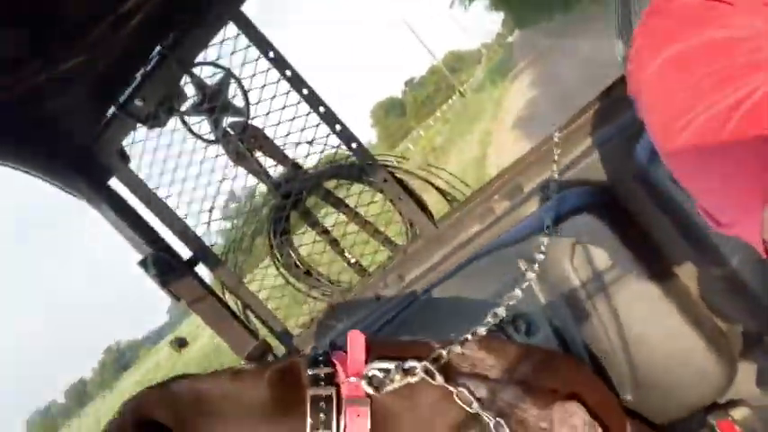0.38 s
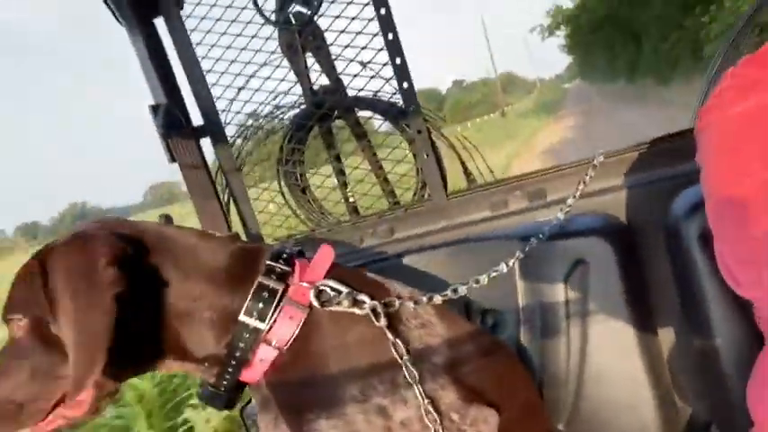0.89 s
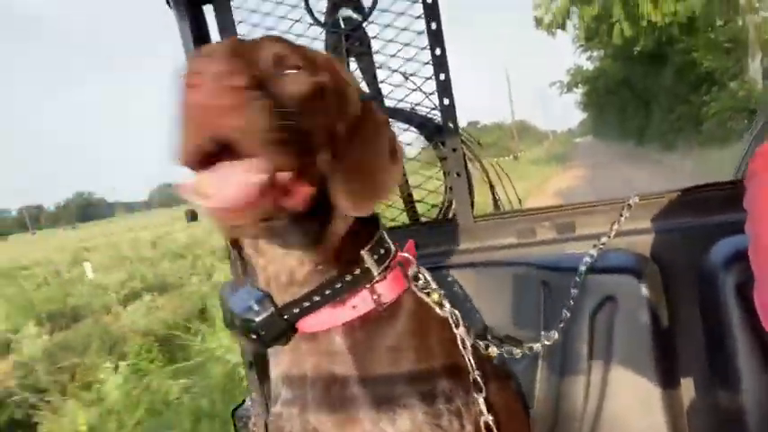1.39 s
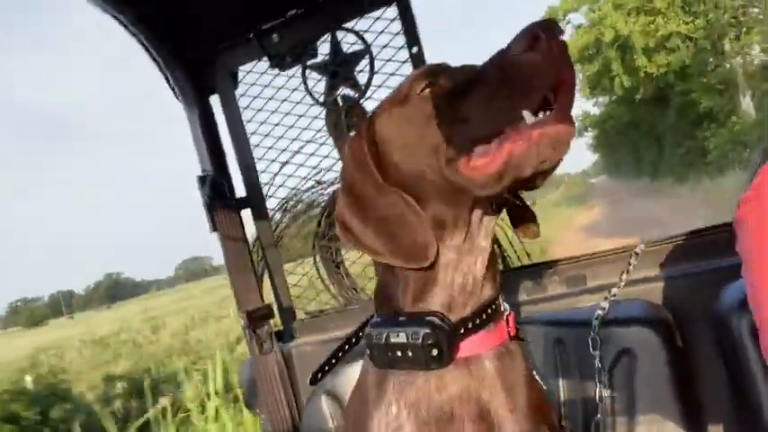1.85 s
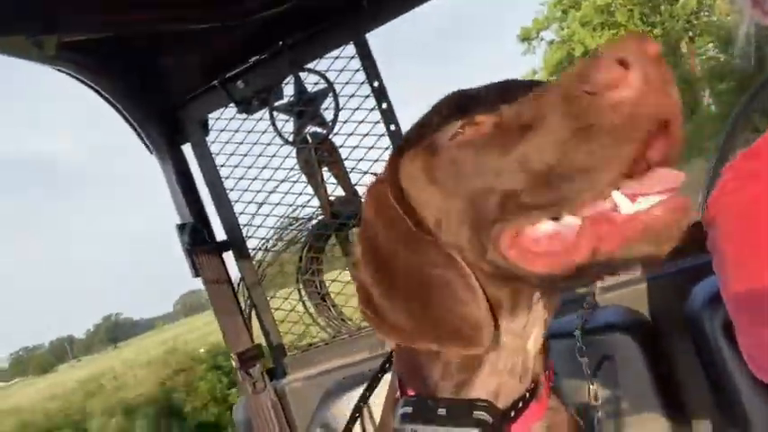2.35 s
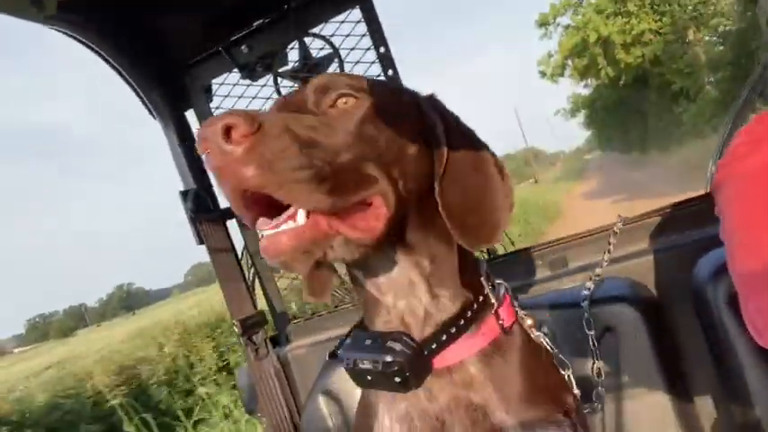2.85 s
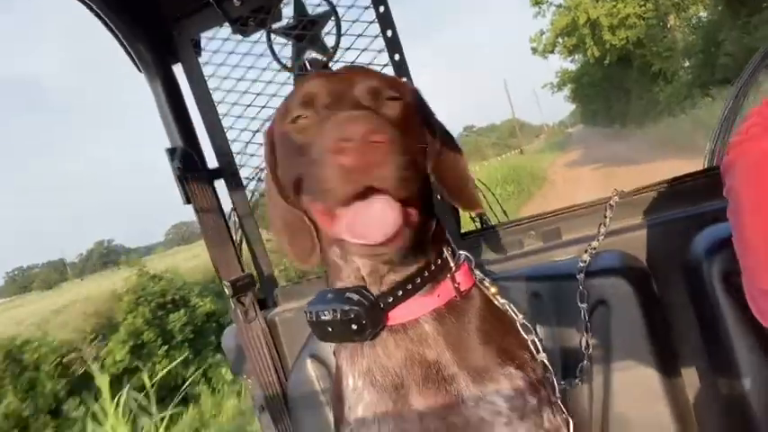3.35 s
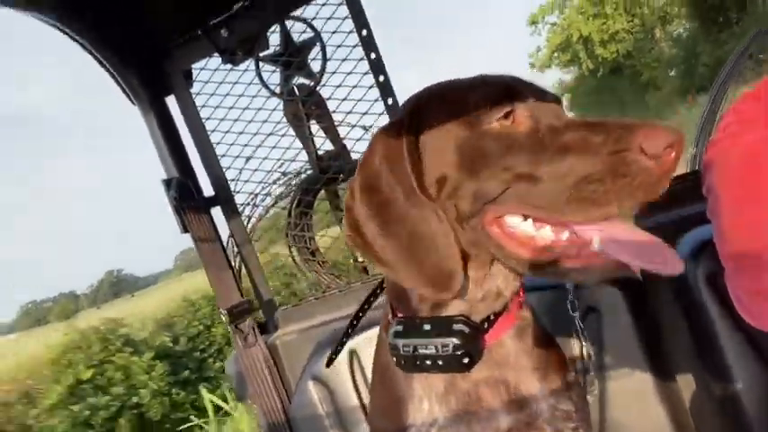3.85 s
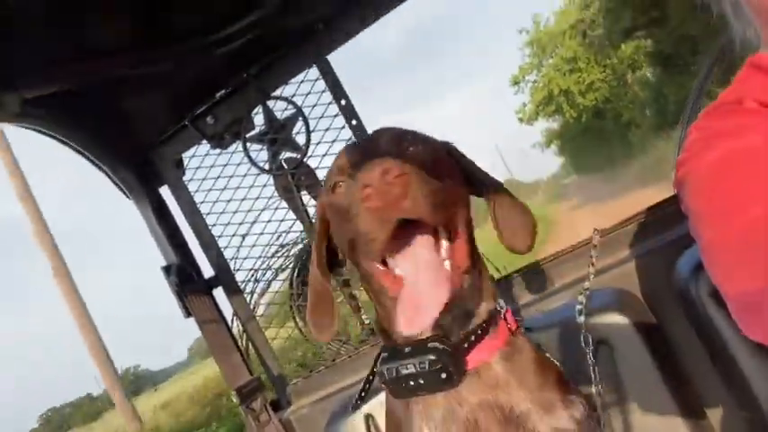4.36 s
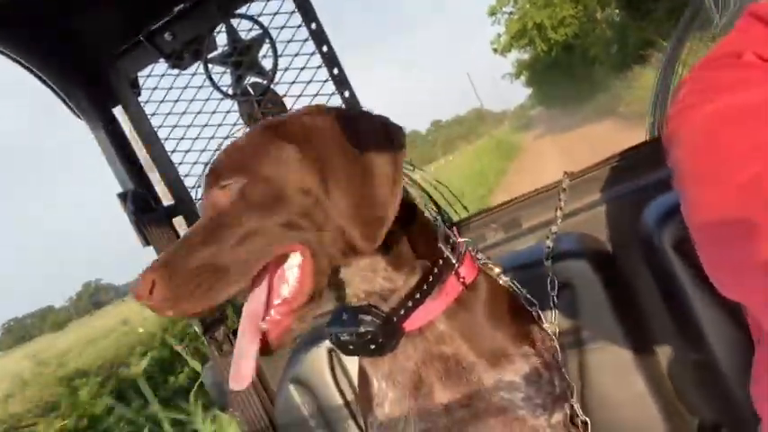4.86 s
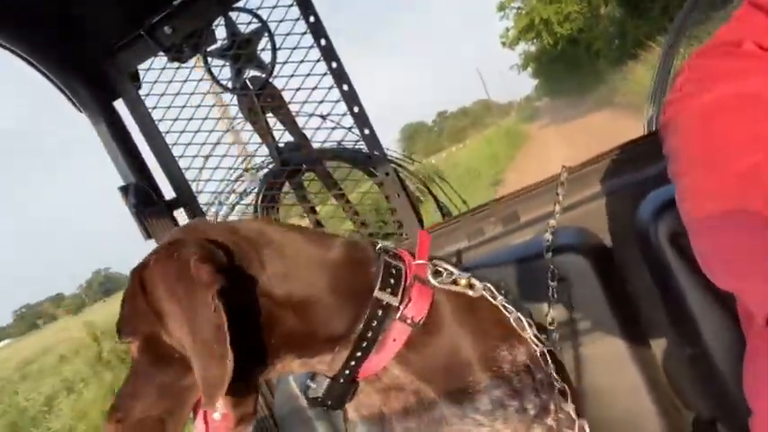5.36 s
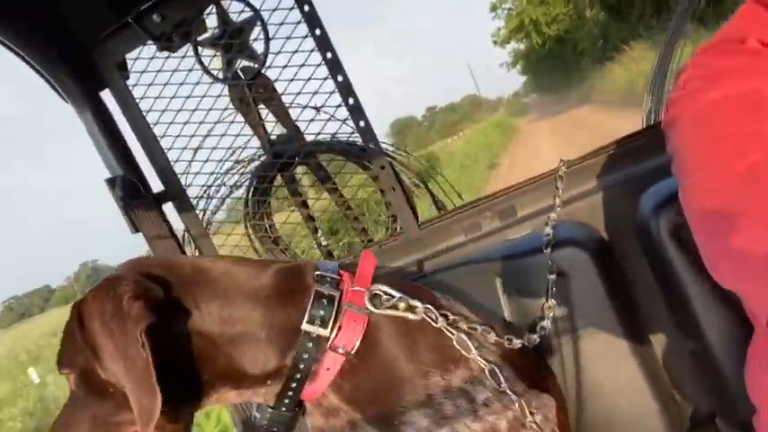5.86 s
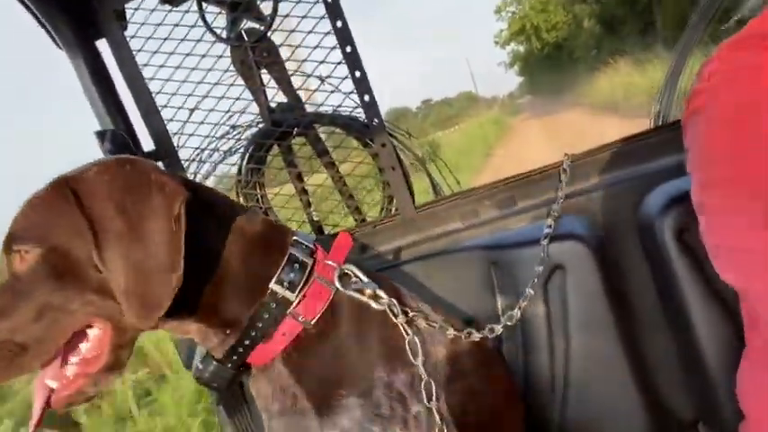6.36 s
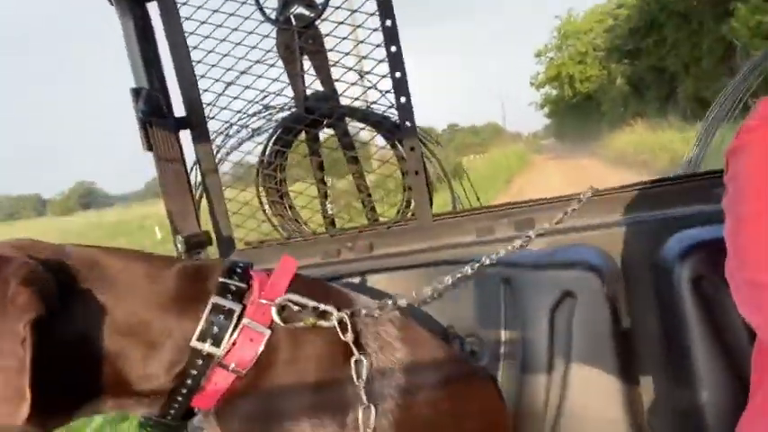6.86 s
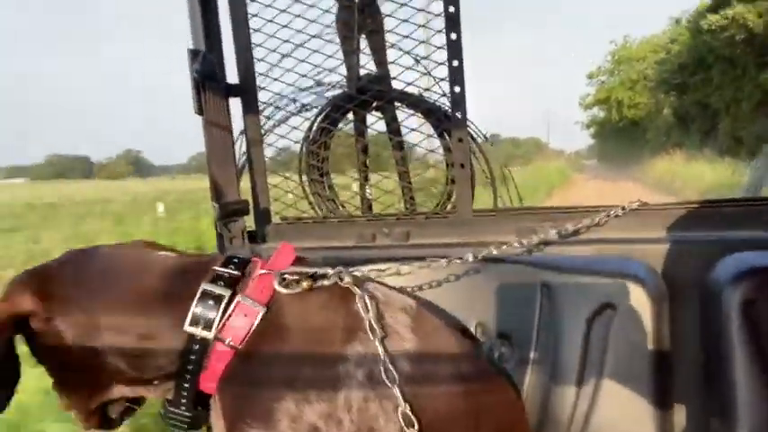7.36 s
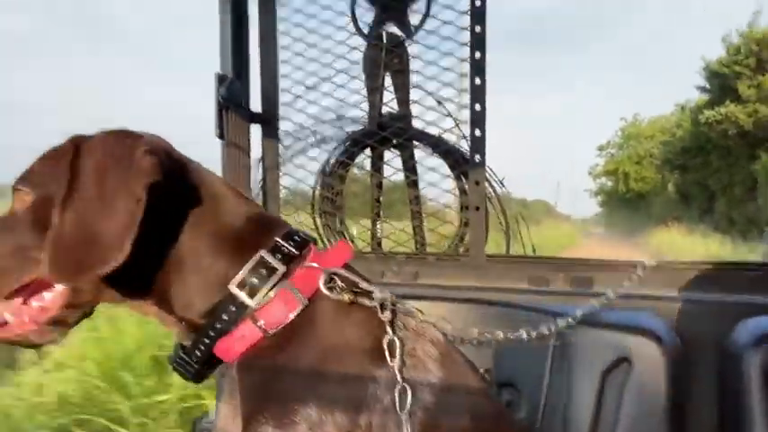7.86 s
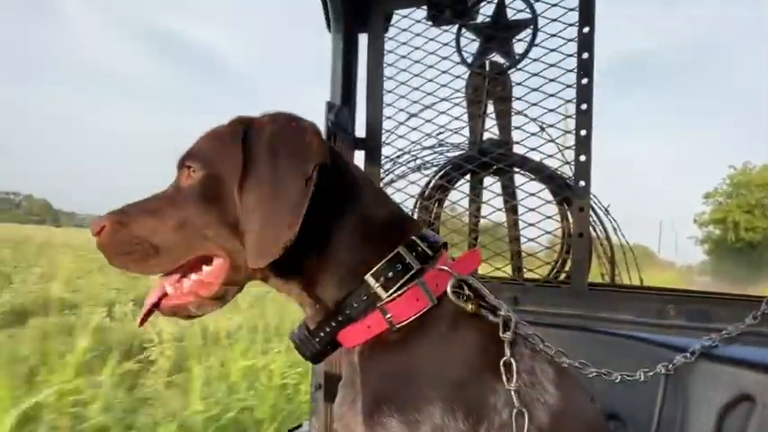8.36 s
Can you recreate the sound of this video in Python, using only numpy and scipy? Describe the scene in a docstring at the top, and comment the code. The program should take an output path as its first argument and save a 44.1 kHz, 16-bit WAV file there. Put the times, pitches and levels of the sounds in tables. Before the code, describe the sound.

Inside an open utility vehicle on a dirt track, a loud, steady low exhaust drone dominates, with body and tyre roar and a thin wavering gear whine beneath. A dog's metal chain chinks irregularly, most sharply near five seconds, when wind also thumps the close stereo microphone. Loose fittings tick faintly throughout.

```python
"""The exhaust boom of a four-stroke engine runs throughout, while an open utility vehicle rolls along a
dirt track. The place is the cab, heard close on a pair of microphone ports. The boom is a sum of firing
orders; gear whines and ringing panels are tones spread by noise; a dog's chain chinks in struck modes and
bursts; loose fittings tick through resonators. Behind them, body and tyres roar in bands of noise,
and wind buffets the ports with lumpy low noise and short puffs."""
import sys
import numpy as np
from scipy import signal
from scipy.fft import rfft, irfft, next_fast_len
from scipy.io import wavfile

SR = 44100
rng = np.random.default_rng(int(sys.argv[2]) if len(sys.argv) > 2 else 0)


def generate_wav(sig):
    """Save sig (samples, or channels by samples) to the path in sys.argv[1] as 16-bit PCM at SR."""
    pcm = np.round(np.clip(np.atleast_2d(sig).T, -1, 1) * 32767).astype(np.int16)
    wavfile.write(sys.argv[1], SR, pcm)


def invert_db(x):
    """Field ratio 10**(x/20) for x, a level in decibels (scalar or array-like)."""
    u = np.asarray(x, float) / 20
    return 10 ** u


N = 384596

# In every table pan_db is positive to the left port, and lag_rad is how far the left port lags.
# engine speed: start_s, firing_cycles_per_s
ENGINE_SPEED = [(0.0, 21.181), (0.51, 21.635), (1.03, 21.699), (1.54, 21.772), (2.05, 21.766),
                (2.56, 21.651), (3.08, 21.861), (3.59, 21.649), (4.1, 21.762), (4.62, 21.876),
                (5.13, 21.998), (5.64, 22.042), (6.16, 22.159), (6.67, 22.045), (7.18, 21.793),
                (7.69, 22.09), (8.21, 21.956), (8.72, 22.174)]
# strength of each exhaust order: multiple_of_cycle_rate, relative_level_db
EXHAUST_ORDERS = [(2, -46), (3, -17.5), (4, 0), (5, -1.5), (6, -19), (7, -19), (8, -21), (9, -35),
                  (10, -27.5)]
# exhaust resonances that delay the orders: pitch_hz, width_hz
PIPE_RESONANCES = [(91, 14), (106, 14), (144, 16)]
# lower gear whine, following road speed: start_s, pitch_hz, level_db
LOWER_WHINE = [(0, 797, -37.5), (1.5, 799, -36), (2.4, 818.3, -35.5), (4.0, 818.3, -33), (5.7, 828, -35),
               (6.5, 825.4, -34), (7.6, 848, -33.5), (8.72, 846.5, -33)]
# image of the lower whine, swinging from right to left: start_s, pan_db, lag_rad
WHINE_IMAGE = [(0, -6, 0.3), (1.7, -9, -1.7), (3.9, -6.5, 1.5), (5.5, -5, 1.5), (6.2, -5, 2.5),
               (7.1, 11, 3), (8.72, 12, 3)]
# other drivetrain levels: start_s, upper_whine_db, housing_ring_db, thin_high_tone_db
DRIVETRAIN_LEVELS = [(0, -43, -38, -43), (.6, -39, -41, -46), (1.7, -33.5, -36, -50),
                     (2.4, -39.5, -41, -58), (3.4, -33.5, -37.5, -47), (4.1, -40, -43, -58),
                     (5.0, -33, -41.5, -43), (5.75, -36, -47, -42), (6.15, -31.5, -37.5, -43),
                     (6.9, -34.5, -33.5, -59), (7.1, -46, -36, -57), (7.8, -43, -32.5, -54),
                     (8.2, -39, -39, -42), (8.72, -40, -41, -44)]
# ringing panels: pitch_hz, width_hz, relative_level_db, pan_db, lag_rad
PANEL_RINGS = [(1056, 55, -41.5, 0.5, -0.3), (1227, 22, -43, -2, -1.9), (2658, 32, -45, 1, 4),
               (2913, 44, -50, 1, 3.5)]
# the louder chain chinks: start_s, level_db, low_modes_db
LOUD_CHINKS = [(0.2478, -32, -8), (0.6602, -22, -2.5), (0.9684, -37, 10), (1.0114, -39, 10),
               (1.097, -36.5, 9), (1.2017, -31, -7), (1.2594, -35, 1), (1.3897, -34, -9),
               (1.4832, -28.5, 6.5), (1.7757, -27.5, 8.5), (2.0394, -30, -10), (2.6439, -30, -10),
               (2.8714, -28, -6), (3.3308, -25.5, -2), (4.117, -24.5, 3.5), (4.9174, -16.5, 0),
               (5.106, -19, -9), (5.4271, -34, -9), (5.5263, -29, -5), (5.5817, -27, -11),
               (6.183, -20.5, -3), (6.8433, -28.5, -5), (7.2275, -32.5, 4), (7.4405, -22, -8.5),
               (7.7403, -36, 13), (7.8052, -28, -15), (7.9329, -26, -4), (8.6113, -25.5, -5)]
# ringing modes of the chain links: pitch_hz, relative_level_db, t60_s
LINK_MODES = [(3200, -4, .07), (3800, 2, .08), (4450, -3, .06), (5500, 0, .06), (6430, -7, .04),
              (7500, -9, .04), (8400, -9, .035), (9600, -10, .03), (11500, -7, .03), (12450, -9, .03)]
# roar of body, intake and tyres: pitch_hz, level_db_per_hz, port_likeness (0 to 1),
# pan_db (added on the left and taken off on the right, in each port's own part only)
ROAR_SPECTRUM = [(28, -63, 0.89, 8), (45, -48.5, 1, 0), (69.6, -41, 1, 0), (115, -45, 1, 6),
                 (187, -51, 1, 4), (320, -51.5, 0.98, 9.5), (480, -53, 0.94, -5.5), (682, -59, 0.99, 17),
                 (1110, -64.5, 0.68, 4), (1360, -64, 0.82, 3.5), (2130, -67, 0.34, 3), (2740, -76, 1, -2.5),
                 (3580, -73, 0.046, 1.5), (4880, -78, 1, 1.5), (6820, -81, 0.82, -3),
                 (8250, -85.5, 0.96, 2), (10500, -89.5, 1, 0), (13000, -90, 0.67, -2), (15500, -88, .98, 2)]
# load on the vehicle, used as departures from the mean: start_s, rumble_db, hiss_db
ROAR_LOAD = [(0, -28, -37.5), (1.3, -24.5, -36.5), (3.3, -26, -37), (4.1, -27, -37), (5.7, -26.5, -37),
             (6.5, -27.5, -39), (8.72, -27, -36.5)]
# gusts on the ports: centre_s, level_db, half_length_s (to 1/e)
WIND_GUSTS = [(.12, -31, 0.31), (3.98, -27, 0.061), (5.287, -16.5, .08), (5.6, -39, 0.14),
              (6.004, -29, .07), (8.3, -38.5, 0.74)]
# single puffs of wind: centre_s, level_db, pitch_hz, pan_db
WIND_PUFFS = [(0.115, -9, 151, 1.5), (0.157, -11, 276, 3), (0.169, -15, 50, 2), (3.306, -17.5, 480, -2),
              (4.755, -14, 412, 3), (4.85, -15.5, 248, -1), (5.258, -13, 320, 5), (5.286, -10.5, 168, 4),
              (5.325, -18, 233, 13), (3.375, -16, 500, -1), (3.41, -12, 480, -1), (3.45, -18, 390, -2),
              (5.299, -13.5, 513, 6), (5.341, -2, 415, 4)]

FIRST_FIRING_S = .0307
PORT_LAG_S = .000095   # chain, rattle and hiss reach the left port later


def rms_one(x):
    """Scale to unit rms."""
    return x / np.sqrt(np.mean(x ** 2) + 1e-20)


def in_time(rows):
    """Columns of a table as curves over all samples."""
    start_s, *columns = np.transpose(rows)
    return [np.interp(np.arange(N) / SR, start_s, column) for column in columns]


def drift(corner_hz):
    """Slow chance with spread 1: noise through two equal poles, at one point per 40 samples."""
    pole = np.exp(-80 * np.pi * corner_hz / SR)
    noise = rng.standard_normal(N // 40 + 2002)
    slow = signal.lfilter([1], [1, -2 * pole, pole * pole], noise)[2000:]   # settled part only
    return np.interp(np.arange(N) / 40, np.arange(len(slow)), rms_one(slow))


def narrow_noise(width_hz):
    """Complex wobble that spreads a tone over a width."""
    return (drift(width_hz * .78) + 1j * drift(width_hz * .78)) / np.sqrt(2)


def to_ports(x):
    """The left port hears a sound a little later than the right: a delay by phase slope."""
    size = next_fast_len(N + 64)
    hz = np.arange(size // 2 + 1) * SR / size
    late = rfft(x, size) * np.exp(-2j * np.pi * hz * PORT_LAG_S)
    return np.array([irfft(late, size)[:N], x])


def tone(hz, width_hz, level_db, pan_db, lag_rad, clean, alike):
    """A tone, part steady and part spread; the ports share only some of the spread part."""
    carrier = np.exp(2j * np.pi * np.cumsum(hz * np.ones(N)) / SR)
    shared = narrow_noise(width_hz)
    ports = []
    for side in (1, -1):   # left, right
        spread = np.sqrt(alike) * shared + np.sqrt(1 - alike) * narrow_noise(width_hz)
        wobble = np.sqrt(clean) + np.sqrt(1 - clean) * spread
        wave = wobble * carrier * np.exp(-.5j * side * lag_rad)
        ports.append(np.sqrt(2) * invert_db(level_db + side * pan_db / 2) * wave.real)
    return np.array(ports)


def cycle_angle():
    """Angle through the firing cycle in radians, from the summed engine speed."""
    rate, = in_time(ENGINE_SPEED)
    return 2 * np.pi * (np.cumsum(rate) / SR - FIRST_FIRING_S * rate[0])


def exhaust(uneven_db=1., wobble_rad=0.013):
    """Orders of the firing pulse, each delayed by the pipe resonances; firings differ a little."""
    start_db, sag_db_per_s = -11, 0.07
    angle = cycle_angle() + wobble_rad * drift(5.7)
    mean_rate = np.mean(ENGINE_SPEED, axis=0)[1]
    boom = 0
    for order, level_db in EXHAUST_ORDERS:
        hz = order * mean_rate
        lag = sum(np.arctan2(width * hz, centre ** 2 - hz ** 2) for centre, width in PIPE_RESONANCES)
        boom = boom - invert_db(level_db + uneven_db * drift(6.2)) * np.cos(order * angle - lag)
    return invert_db(start_db - sag_db_per_s * np.arange(N) / SR) * rms_one(boom)


def gears():
    """Two whines an octave apart flutter in pitch together; the housing rings in three strands."""
    housing_hz, high_hz, whine_swell_db = 1787, 2080, 1.5
    upper_db, housing_db, high_db = in_time(DRIVETRAIN_LEVELS)
    pan_db, lag_rad = in_time(WHINE_IMAGE)
    lower_hz, lower_db = in_time(LOWER_WHINE)
    lower_hz = lower_hz * (1 + 0.003924 * drift(3.12))
    lower_db = lower_db + whine_swell_db * drift(1.6)
    out = tone(lower_hz, 23.5, lower_db, pan_db, lag_rad, clean=0.42, alike=0.67)
    out += tone(2 * lower_hz, 45.0, upper_db, 2.8, 0.55, clean=0.14, alike=0.78)
    for ratio, strand_db in ((1.024, -4.0), (.999, 0.0), (.966, -7.0)):
        strand_hz = housing_hz * ratio * (1 + 0.00402 * drift(1.5))
        out += tone(strand_hz, 35.0, housing_db + strand_db, 4.0, 1.0, clean=0.0078, alike=0.74)
    return out + tone(high_hz, 31.0, high_db, 4.1, 1.4, clean=0.069, alike=0.51)


def panels():
    """Panels ring as spread tones at fixed pitches; together they build up, then fade."""
    t = np.arange(N) / SR
    fade_db_per_s, rise_s = 0.97, 0.81
    level_db = 6 - fade_db_per_s * t - 8.3 * np.exp(-t / rise_s)
    return invert_db(level_db) * sum(tone(*panel, clean=0.0078, alike=0.62) for panel in PANEL_RINGS)


def chain(crack_db=-3., ring_db=-9.5, tail_db=-6., echo_db=-17., aside_db=.6, front_db=-14.):
    """Each chink: a short crack, the link modes struck with fresh strengths, and a rattling tail."""
    faint_count, faint_db, crack_t60_s, tail_t60_s, echo_t60_s = 16, -38, .016, 0.12, 0.51
    out, t = np.zeros(N + SR), np.arange(SR // 5) / SR
    hz, mode_db, mode_t60 = np.transpose(LINK_MODES)[:, :, None]
    # fainter chinks fall at random: time, level within 5 dB, low modes within 20 dB
    faint = rng.random((faint_count, 3)) * [N / SR, 5, 20] + [0, faint_db, -12]
    low_band = signal.butter(2, [3000, 4440], "band", fs=SR, output="sos")
    high_band = signal.butter(2, [5000, 11500], "band", fs=SR, output="sos")
    decay = invert_db(-60 * t / mode_t60)   # each link mode dies away at its own rate
    for start_s, level_db, low_db in np.vstack([LOUD_CHINKS, faint]):
        strength_draw, pitch_draw = rng.standard_normal((2, len(hz), 1))
        strength = invert_db(mode_db + 4 * strength_draw + (hz < 6000) * low_db)
        rings = strength * decay * np.sin(2 * np.pi * hz * (1 + 0.031 * pitch_draw) * t)
        noise = rng.standard_normal(len(t))
        burst = noise * (invert_db(crack_db - 60 * t / crack_t60_s) + invert_db(tail_db - 60 * t / tail_t60_s))
        burst += noise[::-1] * invert_db(echo_db - 60 * t / echo_t60_s)   # the cab frame rings on faintly
        low_burst = 1.9 * invert_db(low_db) * signal.sosfilt(low_band, burst)
        burst = 0.53 * signal.sosfilt(high_band, burst) + low_burst
        at = round(start_s * SR)
        out[at:at + len(t)] += invert_db(level_db) * (burst + invert_db(ring_db) * rings.sum(axis=0))
    aside = to_ports(out[:N]) * invert_db(np.array([[-1.], [1.]]) * aside_db)
    return aside + invert_db(front_db) * out[:N]   # part of it meets both ports at once


def rattle(per_s=30., level_db=-36.5):
    """Loose fittings tick at random, in clumps, each ringing down by 60 dB in 45 cycles."""
    born = rng.random(N) < per_s * invert_db(5 * drift(3.)) / SR
    sizes = invert_db(level_db + 3.5 * np.minimum(rng.exponential(1, N), 3)) * rng.choice([-1, 1], N)
    pitches, dealt = np.geomspace(2200, 5200, 8), rng.integers(0, 8, N)
    out = 0
    for k, hz in enumerate(pitches):
        pole, step = invert_db(-60 * hz / (45. * SR)), 2 * np.pi * hz / SR
        ticks = sizes * born * (dealt == k) + 1e-18
        resonator = [1, -2 * pole * np.cos(step), pole * pole]
        out = out + signal.lfilter([0, np.sin(step)], resonator, ticks)
    return to_ports(out)


def cab_null(x):
    """The cab cancels part of a narrow band."""
    null_hz, sharpness, share = 1003, 9.1, 0.47
    return x - share * signal.lfilter(*signal.iirpeak(null_hz, sharpness, SR), x)


def roar(patchy_db=.95, throb=.07):
    """Third-octave noise bands, patchy, throbbing twice a cycle, most in the lows, and following the load."""
    surge_db, surge_corner_hz = 0.4, 2
    table, edges = np.array(ROAR_SPECTRUM), 24 * 2 ** np.arange(0, 9.5, 1 / 3)
    rumble_db, hiss_db = [
        c - c.mean() + surge_db * drift(surge_corner_hz) for c in in_time(ROAR_LOAD)]
    white = rng.standard_normal((2, 3, N))   # neighbouring bands take different noise
    together = drift(31.0)   # flicker common to the high bands
    bumps = drift(4.2)   # the rumble surges over ruts
    pulsing = throb * np.cos(2 * cycle_angle())
    centred, aside, own = 0, 0, 0
    for k, (low, high) in enumerate(zip(edges, edges[1:])):
        sos = signal.butter(2, [low, high], "band", fs=SR, output="sos")
        bands = signal.sosfilt(sos, white[k % 2])
        hz = np.sqrt(low * high)
        level_db, alike, pan_db = [
            np.interp(np.log(hz), np.log(table[:, 0]), c) for c in table[:, 1:].T]
        bright = np.clip(np.log2(hz / 700) / 2, 0, 1)   # 0 up to 700 Hz, 1 from 2800 Hz
        flicker_db = 0.31 * bright * together + 0.74 * (1 - bright) * bumps
        flicker_db = flicker_db + patchy_db * (1.3 - 0.12 * bright) * drift(10.0)
        # rumble lifts the lows and lowers the highs
        load_db = bright * hiss_db + (0.5 - bright) * rumble_db
        gain = invert_db(level_db + flicker_db + load_db) * (1 + (1 - 0.71 * bright) * pulsing)
        shared = gain * np.sqrt(alike) * bands[0]
        if hz < 1300:
            centred = centred + shared   # the rumble meets both ports at once
        else:
            aside = aside + shared
        own = own + gain * np.sqrt(1 - alike) * bands[1:] * invert_db(np.array([[pan_db], [-pan_db]]))
    return cab_null((centred + to_ports(aside) + own) * np.sqrt(SR / 2))


def wind(breeze_db=-52.5, own_db=-8.0, lumpy_db=3.5):
    """Lumpy low noise, partly different at each port, and short puffs of a few cycles."""
    sos = signal.butter(3, [42, 420], "band", fs=SR, output="sos")
    both, *own = rms_one(signal.sosfilt(sos, rng.standard_normal((3, N))))
    own = signal.lfilter([1, -1], [1, -.985], own)   # with less of the deepest lows
    t = np.arange(N) / SR
    blowing = invert_db(breeze_db)
    for centre_s, level_db, half_s in WIND_GUSTS:
        blowing = blowing + invert_db(level_db) * np.exp(-((t - centre_s) / half_s) ** 2)
    out = blowing * invert_db(lumpy_db * drift(6.7)) * (both + invert_db(own_db) * own)
    for centre_s, level_db, hz, pan_db in WIND_PUFFS:
        near = slice(round((centre_s - .03) * SR), round((centre_s + .03) * SR))
        cycles = (t[near] - centre_s) * hz
        wave = np.cos(2 * np.pi * cycles) + .3 * np.cos(2 * 2 * np.pi * cycles)   # octave sharpens it
        puff = np.exp(-(cycles / 1.3) ** 2) * wave
        out[:, near] += invert_db(level_db + np.array([[pan_db], [-pan_db]]) / 2) * puff
    return out


def scene():
    """All sources summed at the two microphone ports."""
    return exhaust() + gears() + panels() + chain() + rattle() + roar() + wind()


def band_limit(x):
    """A steep low-pass at the top of the band."""
    return signal.sosfilt(signal.butter(12, 15750, fs=SR, output="sos"), x)


def record(dry):
    """The microphone level is lifted a little and its peaks are rounded below a ceiling."""
    ceiling, lift = .98, 1.07
    mix = ceiling * np.tanh(lift * dry / ceiling)
    return band_limit(mix)


dry = scene()
out = record(dry)
generate_wav(out)
```